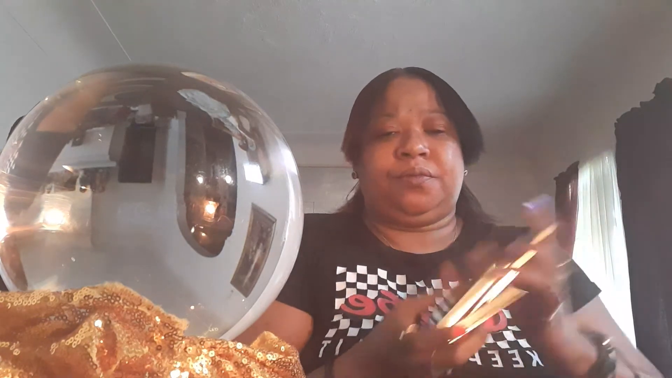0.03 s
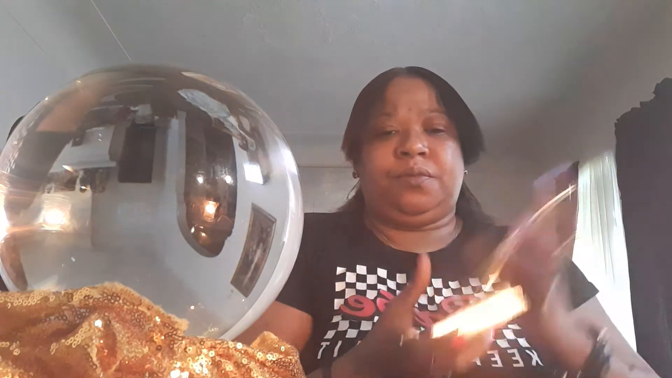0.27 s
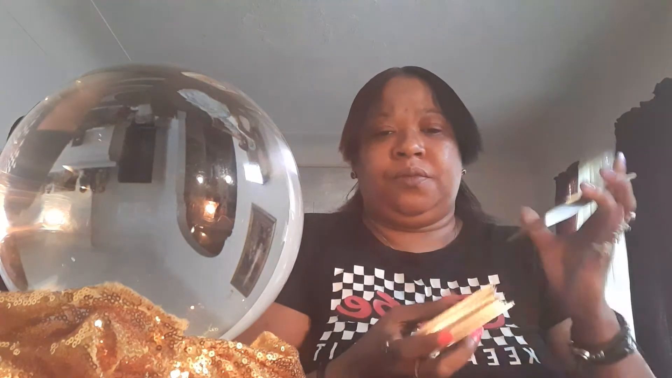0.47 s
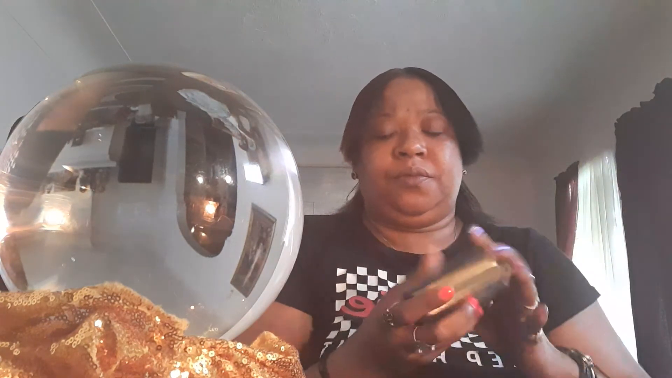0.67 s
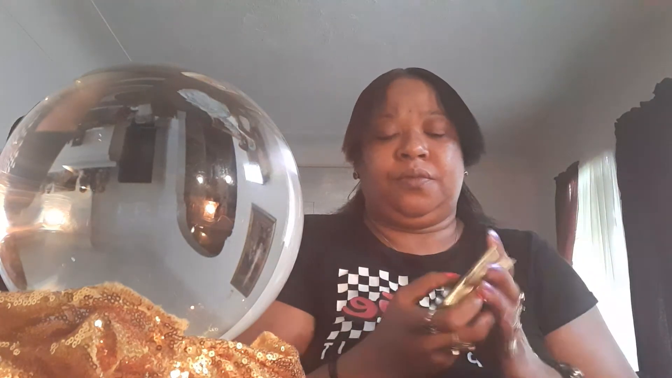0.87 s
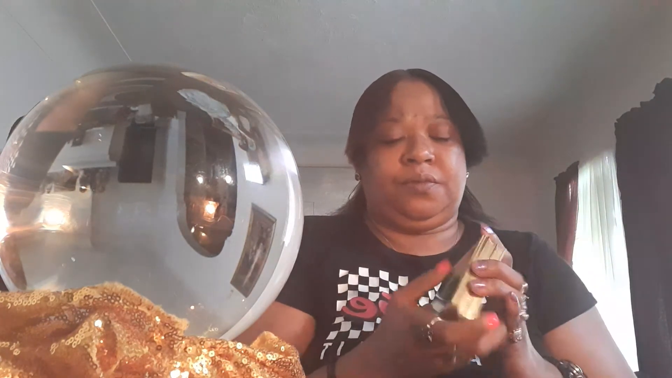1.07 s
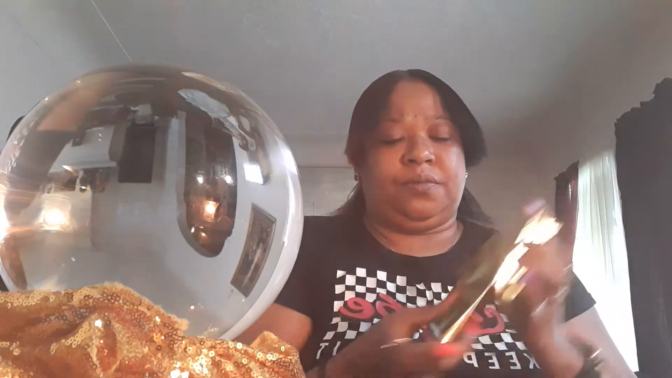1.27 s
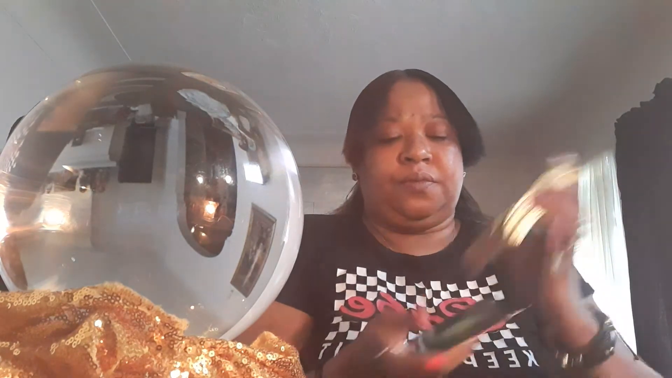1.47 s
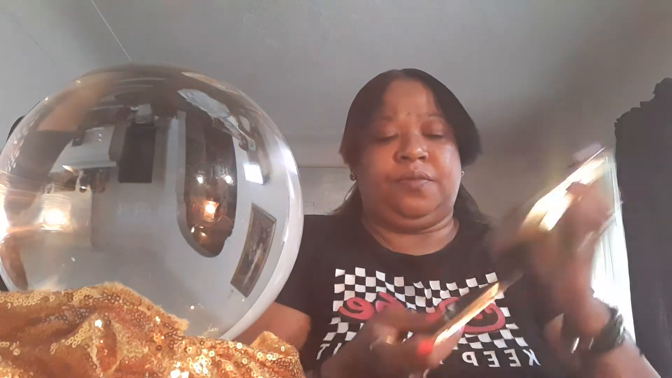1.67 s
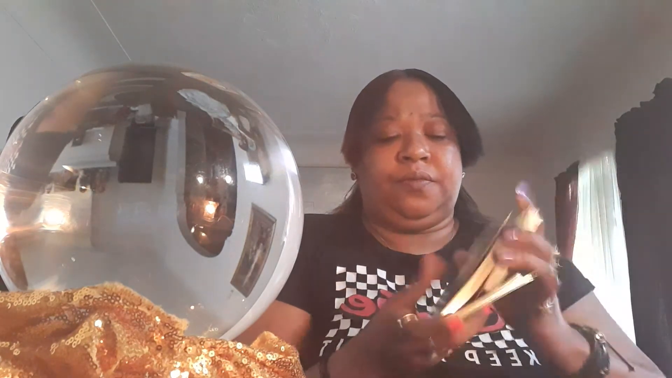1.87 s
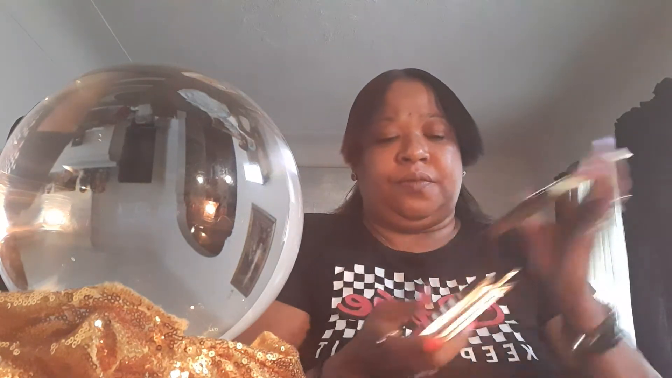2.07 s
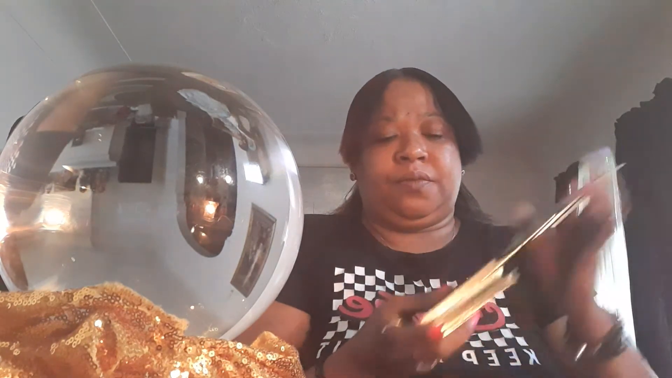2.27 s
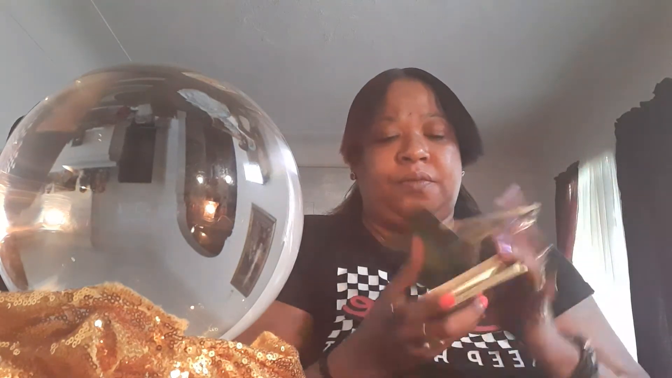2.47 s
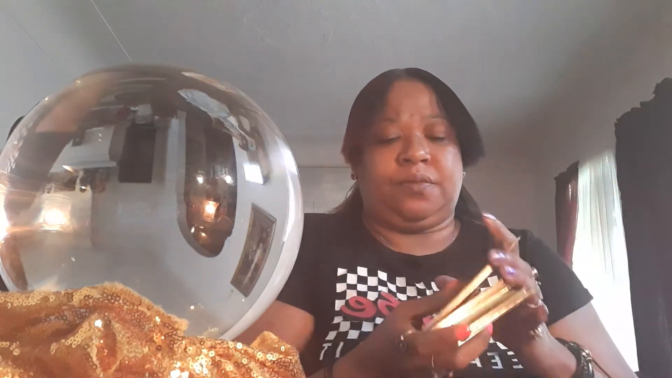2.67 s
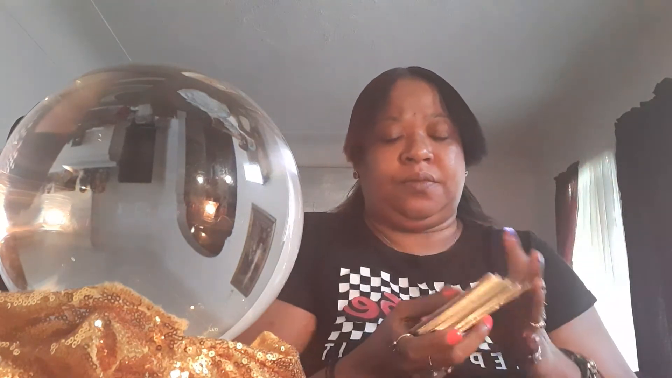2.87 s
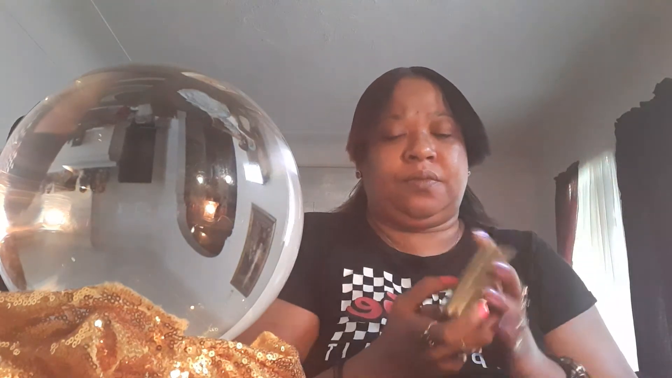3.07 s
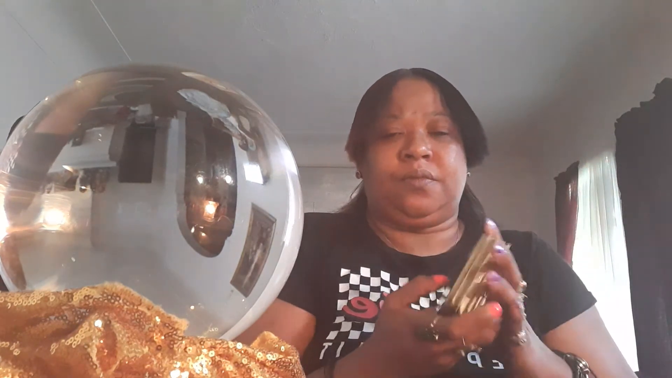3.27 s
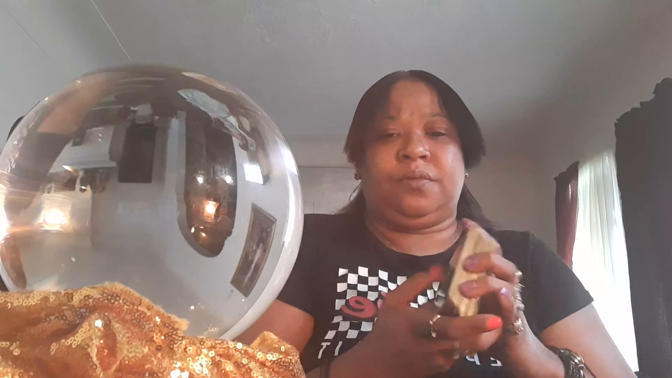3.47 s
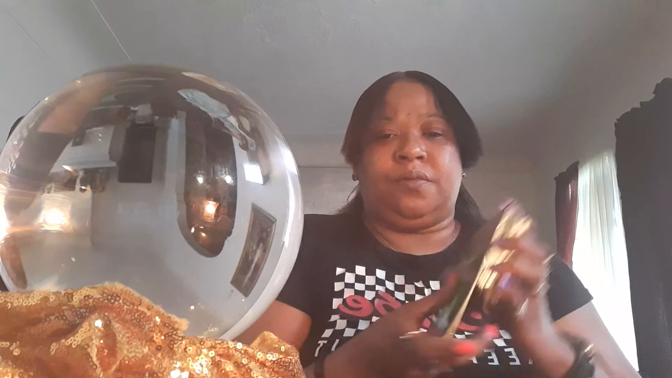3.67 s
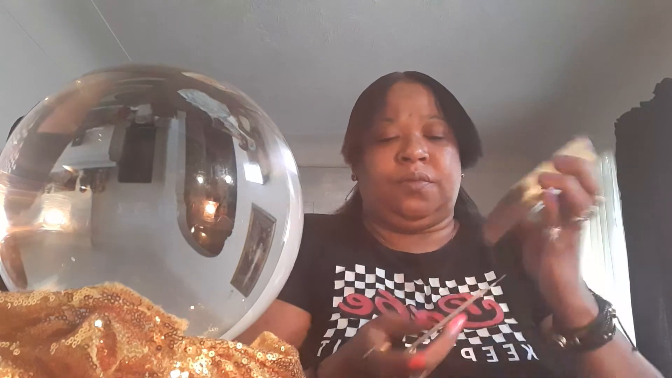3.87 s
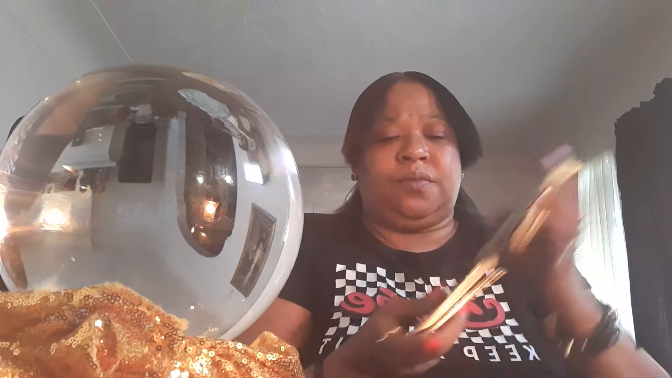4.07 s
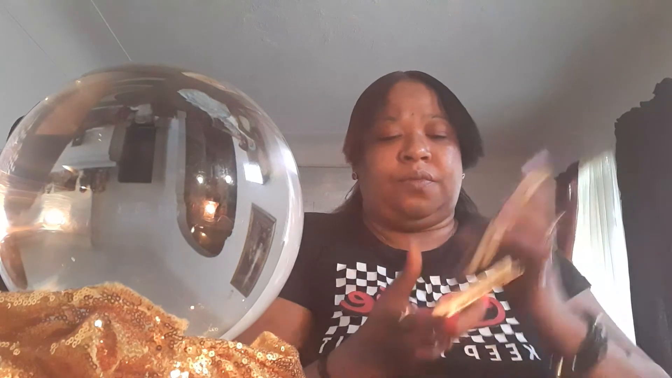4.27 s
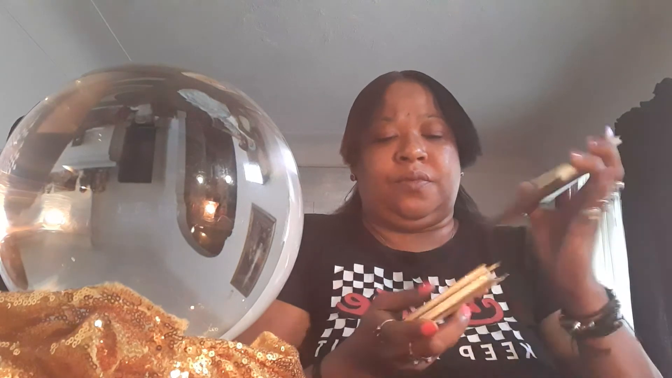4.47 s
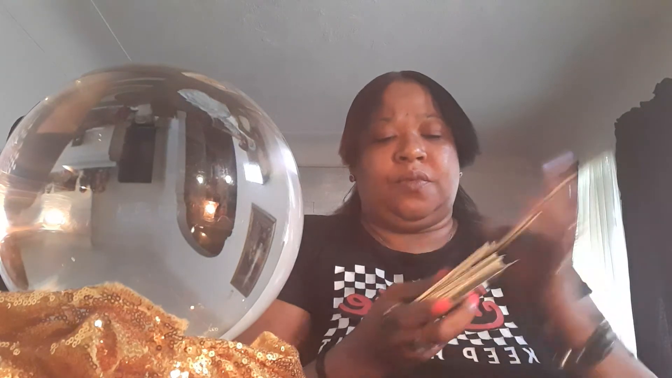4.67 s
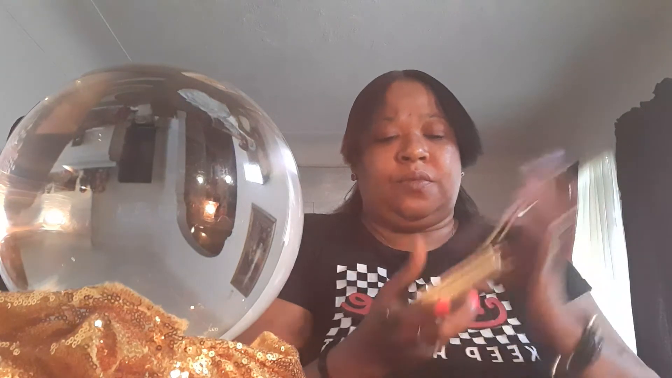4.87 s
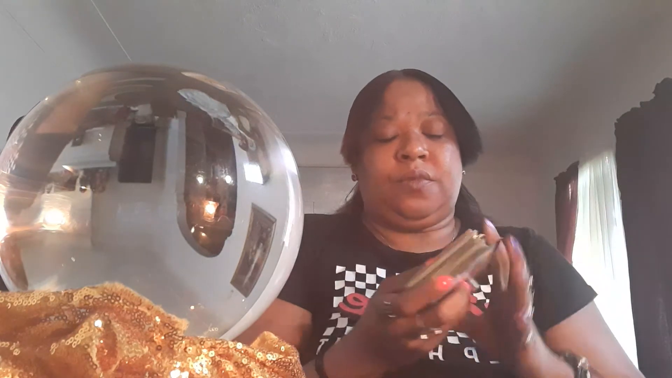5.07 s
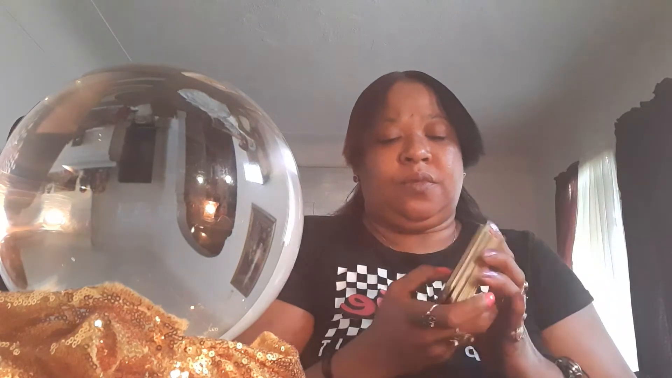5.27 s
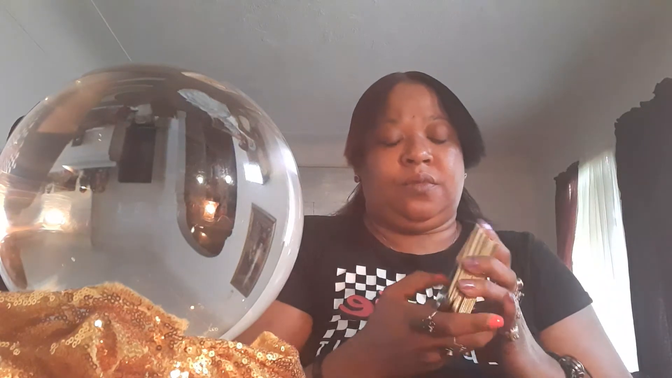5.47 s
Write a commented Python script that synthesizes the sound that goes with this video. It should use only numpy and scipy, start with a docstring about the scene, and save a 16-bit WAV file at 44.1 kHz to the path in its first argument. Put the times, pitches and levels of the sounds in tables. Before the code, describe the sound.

Large stiff cards are shuffled overhand in a small room, with papery slides, sharp slaps and one much harder double smack midway.

```python
"""A deck of large cards is shuffled overhand in a small, bare room, about a metre from a stereo phone.
From the start, over a soft rumble and a little hiss, packets slide by friction noise and slap down with a pop of
trapped air, a crack of edges and, at times, a dull damped tone; the room rings after each.
A faint hum of two low tones comes and goes from 0.75 to 2.4 s, and single edges tick now and then.
The hardest slaps come near 2.43 s; a thin scrape follows near 3.9 s, then more strokes to the end."""
import sys
import numpy as np
from scipy import signal
from scipy.fft import rfft, irfft, next_fast_len
from scipy.io import wavfile
from scipy.ndimage import uniform_filter1d

SR = 44100
rng = np.random.default_rng(int(sys.argv[2]) if len(sys.argv) > 2 else 0)


def bounce(signal):
    """Save signal as a 16-bit WAV file at the path given by the first command-line argument."""
    frames = np.transpose(np.atleast_2d(signal))
    limited = np.clip(frames, -1, 1)
    pcm = np.round(limited * 32767).astype(np.int16)
    wavfile.write(sys.argv[1], SR, pcm)


N = 243516
TIME = np.arange(N) / SR  # seconds

# Colour of rubbed card. Each row: frequency in Hz, relative level in dB.
PAPER_COLOUR = [(30, -48), (100, -8), (250, -8), (400, -5), (650, 1.5), (1100, -5), (1600, -5), (2500, -2),
                (3300, -5), (4600, -0.5), (6300, -8), (9000, -8), (14000, -8.5), (16000, -20)]
SETTLE_S = .003  # how quickly card edges stop pattering after a landing


def undb(db):
    """Decibels to gain."""
    return 10 ** (np.asarray(db) / 20)


def unit(x):
    """Scale to an rms (average strength) of one."""
    return x / np.sqrt(np.mean(x ** 2))


def lookup(points, hz):
    """Read (Hz, value) points on a log-frequency axis."""
    f, value = np.transpose(points)
    return np.interp(np.log(hz + 1), np.log(f), value)


def colour(x, points, tilt_db=0):
    """Causal filter through (Hz, dB) points, tilted per octave; white noise keeps its power."""
    size = 2 * next_fast_len(x.shape[-1])
    hz = np.arange(size // 2 + 1) * SR / size
    gain = unit(undb(lookup(points, hz) + tilt_db * np.log2(1 + hz / 500)))
    # folding the cepstrum onto positive times makes the filter act without any pre-echo
    cepstrum = irfft(np.log(gain))
    cepstrum[1:size // 2] *= 2
    cepstrum[size // 2 + 1:] = 0
    response = np.exp(rfft(cepstrum))
    return irfft(rfft(x, size) * response)[..., :x.shape[-1]]


def high_pass(x, hz, order=4):
    """Steep high-pass."""
    return signal.sosfilt(signal.butter(order, hz, "high", fs=SR, output="sos"), x)


def add(track, start, sound):
    """Mix a sound into a track at a time in seconds."""
    i = max(int(start * SR), 0)
    track[..., i:i + sound.shape[-1]] += sound[..., :N - i]


def walk(rate):
    """Slow chance: random levels, one every 1 / rate seconds, joined by slopes and scaled to an rms of one."""
    k = int(SR / rate)
    steps = np.repeat(rng.standard_normal(N // k + 1), k)
    return unit(uniform_filter1d(steps, k)[:N])


def swell(middle, width):
    """A smooth rise and fall with a peak of one."""
    return np.exp(-.5 * ((TIME - middle) / width) ** 2)


def two_ports(count, alike_hz, most=0.87):
    """Diffuse noise at two close microphone ports: alike in the bass, unrelated above."""
    hz = np.arange(count // 2 + 1) * SR / count
    likeness = most / (1 + (hz / alike_hz) ** 4)
    spectra = rfft(rng.standard_normal((2, count))) * np.sqrt([1 + likeness, 1 - likeness])
    mid, side = irfft(spectra, count)
    return np.array([mid + side, mid - side]) / np.sqrt(2)


def at_ports(x):
    """The hands are to the right, so the left port hears them a moment later."""
    right_lead_s = .00004
    return np.array([np.interp(TIME - right_lead_s, TIME, x), x])


def ring(hz, t60, rise, glide=0):
    """A damped tone with a soft start and about unit peak; its pitch climbs by the share glide as it dies."""
    t = TIME[:SR // 3]
    # t60 is the time in seconds to fall by 60 dB
    envelope = (1 - np.exp(-t / rise)) ** 2 * np.exp(-np.log(1000) * t / t60)
    pitch = hz * (1 + glide * (np.minimum(2 * t / t60, 1) - .5))
    return envelope / envelope.max() * np.sin(2 * np.pi * np.cumsum(pitch) / SR)


def thud(hz, t60, glide=0, rise_cycles=0.37):
    """A dull damped tone; the lower it is, the softer its start."""
    return high_pass(ring(hz, t60, rise_cycles / hz, glide), hz * 2 / 3)


def patter(settle, alike_hz=2000):
    """Card edges meeting within a few milliseconds: a short burst with an even spectrum."""
    t = TIME[:SR // 20]
    fade = np.exp(-t / settle)
    # keep only the noise's phases, so that every frequency is equally strong
    phases = np.angle(rfft(two_ports(len(t), alike_hz) * fade))
    burst = irfft(np.exp(1j * phases), len(t)) * np.sqrt(fade)
    return unit(burst) * np.sqrt(np.mean(fade ** 2))


def friction(grain_hz=1600, catch_hz=200, alike_hz=900):
    """Paper fibres stick and slip: fast grains and slower catches raise and lower the noise at random."""
    grip = unit(undb(3 * walk(grain_hz) + 2.6 * walk(catch_hz)))
    return grip * two_ports(N, alike_hz)


def background(rumble_db=10):
    """A slowly changing rumble under a nearly steady hiss, both made of coloured noise."""
    # Level of the rumble. Each row: time in seconds, level in dB before rumble_db is added.
    rumble_level = [(0.0, -60.5), (1.55, -59.5), (1.78, -60), (3.74, -69), (4.0, -61.5), (5.5, -61)]
    # Colour of the rumble. Each row: frequency in Hz, relative level in dB.
    rumble_colour = [(25, -36), (45, -13), (65, -0.5), (95, 7.5), (150, -1), (200, 4.5), (250, -5.5),
                     (310, 0.5), (420, -10), (700, -13), (1000, -8.5), (1500, -33), (4000, -43.5)]
    # Colour of microphone hiss and faint handling noise. Each row: frequency in Hz, relative level in dB.
    hiss_colour = [(100, -16), (650, 4), (1000, -14), (1500, -9), (2600, -10), (3500, -18.5), (4500, -9),
                   (5600, -18.5), (9000, -27.5), (13000, -17), (16000, -19)]
    hiss_db = -61.5
    level_db = np.interp(TIME, *np.transpose(rumble_level)) + rumble_db
    rumble = unit(colour(two_ports(N, 350), rumble_colour)) * undb(level_db)
    hiss = unit(colour(two_ports(N, 820), hiss_colour)) * undb(hiss_db + .5 * walk(18.0))
    return rumble + hiss


def slides():
    """Each stroke bites, eases and lets go, then swishes as the packet lifts; soft rubs even up the deck."""
    # Overhand strokes, one packet dragged across the other. Each row: contact in seconds, relative level in dB,
    # attack in seconds, length in seconds, brightness in dB per octave, lift-off delay in seconds,
    # lift-off level in dB against the stroke.
    strokes = [(0.023, -32.5, 0.0084, 0.041, -2, 0.11, -6.5), (0.323, -34.5, 0.0078, 0.058, 0, 0.045, -24),
               (0.617, -38, 0.0053, 0.073, -2, 0.078, -62), (1.356, -32, 0.012, .018, -3.5, 0.072, -36),
               (1.567, -32, 0.015, 0.062, -2.5, 0.081, -0.5), (1.895, -34.5, 0.023, 0.046, -2, 0.069, -9),
               (2.178, -32.5, 0.015, 0.049, 0, 0.16, -9), (2.428, -18.5, 0.00075, .086, -3.5, 0.12, -15.5),
               (3.773, -34.5, 0.021, 0.018, -2, 0.13, -21), (4.016, -28.5, 0.024, 0.029, -2, 0.072, -7),
               (4.3, -28.5, 0.0018, 0.056, 0, 0.12, -11), (4.595, -24, 0.0014, .026, -1, 0.075, -11.5),
               (4.894, -27.5, 0.0017, 0.04, -2.5, 0.063, -13.5)]
    # Rubs as cards shift in the hand and the deck is evened up.
    # Each row: middle in seconds, width (standard deviation) in seconds, relative level in dB.
    rubs = [(0.358, 0.0042, -37), (.88, 0.059, -55), (1.01, .012, -50), (1.325, 0.05, -52.5),
            (2.81, 0.044, -51.5), (3.108, 0.035, -54), (3.401, 0.013, -57.5), (4.33, 0.009, -40.5),
            (5.224, 0.037, -48), (5.46, 0.048, -58)]
    # the rub climbs by rise_db per attack time, eases as the packet slows, then lets go
    rise_db, ease_db, release_db_per_s = 14, 2, 1523
    lift_width_s = 0.017
    lift_bright_db, rub_bright_db = -2, -1  # per octave

    grains, out, lifts = friction(), np.zeros((2, N)), np.zeros(N)
    for s, db, attack, length, bright_db, lift_delay, lift_db in strokes:
        start = max(s - 2 * attack, 0)
        rub = grains[:, int(start * SR):][:, :SR // 4]
        t = TIME[:rub.shape[1]] + start - s  # seconds from contact
        shape_db = rise_db * np.minimum(t / attack, 0)
        shape_db = shape_db - ease_db * np.clip(t / length, 0, 1)
        shape_db = shape_db - release_db_per_s * np.maximum(t - length, 0)
        add(out, start, colour(rub * undb(db + shape_db), PAPER_COLOUR, bright_db))
        lifts += undb(db + lift_db) * swell(s + lift_delay, lift_width_s)
    evening = sum(undb(db) * swell(s, width) for s, width, db in rubs)
    swishes = colour(friction() * lifts, PAPER_COLOUR, lift_bright_db)
    return out + swishes + colour(grains * evening, PAPER_COLOUR, rub_bright_db)


def slaps(pop_db=0.0, crack_db=-4.0, snap_hz=6000, low_hz=340):
    """Each landing pops the trapped air, sets the packet ringing briefly, and cracks the card edges together."""
    # Packets landing. Each row: start in seconds, strength in dB, pop pitch in Hz,
    # air cushion in dB (how far the pop is raised over the crack of the edges).
    landings = [(0.0226, -27, 2050, 6), (0.3219, -21, 2080, 2.5), (.416, -20, 850, -1.5),
                (.63, -31, 980, 2.5), (0.6528, -23, 1193, 3), (.667, -27.5, 530, 5),
                (1.354, -27.5, 1590, -6), (1.358, -30.5, 4550, 1), (1.585, -22, 1465, 1.5),
                (1.64, -23, 1497, 2), (1.883, -30.5, 1490, -3), (1.995, -28, 2010, -17),
                (2.1725, -23.5, 554, -5), (2.241, -30.5, 2520, -2.5), (2.4309, -6, 1445, -2),
                (2.4533, -8, 1300, -6), (2.4575, -11, 1220, 5), (2.5011, -16, 1078, 4.5),
                (3.0238, -44, 1920, -1), (3.7704, -25.5, 670, -7.5), (3.9968, -16.5, 1520, -10),
                (4.003, -16.5, 1450, -10.5), (4.0862, -35, 1640, 2.5), (4.3, -21, 2120, -15),
                (4.3195, -17, 3835, -1), (4.332, -26, 3260, 5), (4.41, -26, 886, -1),
                (4.5962, -17.5, 1620, 7), (4.895, -17.5, 2435, -1.5), (4.909, -26, 2530, -28),
                (5.2198, -33.5, 1540, -28)]
    # Ways a packet vibrates as it lands. Each row: multiple of the pop pitch, relative level in dB.
    packet_modes = [(.66, -9), (1, 0), (1.45, -5)]
    # Colour of a cracking edge. Each row: frequency in Hz, relative level in dB.
    crack_colour = [(30, -44.5), (100, -14), (280, -8), (600, 4.5), (1200, 3.5), (2400, 4.5), (4600, 1.5),
                    (6500, -12.5), (16000, -71)]
    pop_t60_s, pop_rise_s = .009, .0011
    # the air pocket shrinks as the packet closes, so the pop rises by this share of its pitch
    pop_glide = .3
    # the treble snap follows the slap's strength, less a share of the air cushion
    snap_db, cushion_share = -10.5, 0.14

    pops, cracks, snaps = np.zeros(N), np.zeros((2, N)), np.zeros((2, N))
    for s, db, hz, cushion_db in landings:
        for ratio, mode_db in packet_modes:
            pop = ring(hz * ratio, pop_t60_s, pop_rise_s, pop_glide)
            add(pops, s, undb(db + cushion_db + pop_db + mode_db) * pop)
        add(cracks, s, undb(db + crack_db) * patter(SETTLE_S))
        add(snaps, s, undb(db + snap_db - cushion_share * cushion_db) * patter(SETTLE_S))
    # a card is too small to radiate bass
    pops = high_pass(pops, low_hz)
    return at_ports(pops) + colour(cracks, crack_colour) + high_pass(snaps, snap_hz)


def dull_tones():
    """Dull, short damped tones under the landings: low pops of packets and knocks of the deck."""
    # Low pops and knocks. Each row: start in seconds, level in dB, pitch in Hz.
    low_tones = [(.0227, -22, 890), (.418, -19.5, 716), (.6525, -16.5, 743), (.656, -21, 383),
                 (1.363, -32.5, 462), (1.56, -27, 565), (2.325, -34, 388), (2.433, -17, 550),
                 (2.454, -9.5, 506), (3.026, -42, 516)]
    tone_cycles = 7.2  # until it has fallen by 60 dB
    out = np.zeros(N)
    for s, db, hz in low_tones:
        add(out, s, undb(db) * thud(hz, tone_cycles / hz))
    return at_ports(out)


def opposed(pair, turn_hz=1300, width_hz=420):
    """In one narrow band the two ports hear the cards in opposite phase."""
    left, right = pair
    band = signal.lfilter(*signal.iirpeak(turn_hz, turn_hz / width_hz, fs=SR), right)
    return np.array([left, right - 2 * band])


def room(x, wet_db=-4.0, modes_db=-57):
    """Close walls answer within milliseconds: a dense tail with a few resonances standing out."""
    # How long the room rings. Each row: frequency in Hz, time to fall by 60 dB in seconds.
    ring_times = [(100, .8), (250, .55), (500, .45), (1500, .44), (5000, .47), (10000, .43), (16000, .39)]
    # Colour of the echo. Each row: frequency in Hz, relative level in dB.
    echo_colour = [(100, -7.5), (190, -12.5), (260, 0), (380, 1.5), (600, -1.5), (1200, -3.2), (2500, -2),
                   (5000, -2), (16000, 1.5)]
    # Strongest resonances. Each row: frequency in Hz, level in dB before modes_db is added.
    resonances = [(369, -4), (494, -3), (576, -2), (648, -2), (678, -5), (760, -6), (836, -4), (890, -4),
                  (1110, -4), (1231, -4), (1395, -2), (1537, -2)]

    t = TIME[:SR * 3 // 4]
    # noise that dies away at its own pace in each frequency band
    hz, when, bands = signal.stft(two_ports(len(t), 700, most=.65), SR, nperseg=256)
    decay = np.exp(-np.log(1000) * when / lookup(ring_times, hz)[:, None])
    tail = signal.istft(bands * decay, SR)[1][:, :len(t)]
    tail = tail * np.clip(t / .006 - .5, 0, 1)  # fades in from 3 to 9 ms
    tail = colour(unit(tail) / np.sqrt(len(t)), echo_colour) * undb(wet_db)
    for f, db in resonances:
        # the shorter the wave, the more its phase differs between the ports
        phase = rng.uniform(0, 2 * np.pi) + rng.standard_normal((2, 1)) * f / 900
        fade = np.exp(-np.log(1000) * t / lookup(ring_times, f))
        tail = tail + undb(modes_db + db) * np.sin(2 * np.pi * f * t + phase) * fade
    return signal.fftconvolve(x, tail, axes=1)[:, :N]


def low_thumps():
    """Two low thumps near 120 Hz, at 0.66 and 2.47 s, sinking in pitch as they fade."""
    # Each row: start in seconds, level in dB.
    thumps = [(.662, -27.5), (2.465, -33.5)]
    thump_hz, thump_t60_s = 119, 0.22
    thump_sag = .16  # share of its pitch by which the thump sinks
    out = np.zeros(N)
    for s, db in thumps:
        add(out, s, undb(db) * thud(thump_hz, thump_t60_s, -thump_sag))
    return at_ports(out)


def hum(hum_db=-2.0, waver_db=4.0, wander_hz=3.5, port_phase=0.38):
    """Two low sine tones swell, waver in level and wander in pitch, then die away."""
    # Level of the hum. Each row: time in seconds, lower tone in dB, upper tone in dB, before hum_db is added.
    hum_levels = [(0.8, -70, -50.5), (0.938, -74, -56), (1.04, -50, -47.5), (1.664, -46, -54.5),
                  (1.726, -46, -60), (1.966, -67, -54), (2.328, -53, -61), (2.4, -67, -67)]
    # Middle pitch in Hz of the lower tone, then of the upper tone.
    tone_hz = (122, 213.5)
    start_s, fade_s = 0.75, 0.083

    s, *levels = np.transpose(hum_levels)
    fade = np.clip(np.minimum(TIME - start_s, s[-1] - TIME) / fade_s, 0, 1)
    port_phases = np.array([[-port_phase], [port_phase]])  # radians, left and right
    out = 0
    for hz, db in zip(tone_hz, levels):
        pitch = hz + wander_hz * walk(14.35)
        phase = 2 * np.pi * np.cumsum(pitch) / SR + port_phases
        level_db = np.interp(TIME, s, db) + hum_db + waver_db * walk(12.96)
        out = out + np.sqrt(2) * np.sin(phase) * undb(level_db)
    return out * fade


def flicks(flick_db=1, tilt_db=3):
    """One stiff edge snaps free past a nail: a thin, bright tick of noise."""
    # Single card edges. Each row: start in seconds, level in dB before flick_db is added.
    ticks = [(0.834, -48), (1.005, -56), (1.1978, -46.5), (2.344, -50.5), (3.592, -48.5), (4.4728, -36)]
    out = np.zeros((2, N))
    for s, db in ticks:
        add(out, s, undb(db + flick_db) * patter(SETTLE_S / 2))
    return colour(out, PAPER_COLOUR, tilt_db)


def scrape(sharpness=14):
    """Friction on a card's edge rings one narrow, high resonance."""
    middle_s, width_s, pitch_hz, level_db = 3.92, .05, 4350, -55
    thin = signal.lfilter(*signal.iirpeak(pitch_hz, sharpness, fs=SR), friction())
    return unit(thin) * undb(level_db) * swell(middle_s, width_s)


def scene(slide_db=-2):
    """The cards, the low thumps, their echo and the room's own sound."""
    cards = undb(slide_db) * slides() + slaps() + dull_tones() + low_thumps() + flicks() + scrape()
    cards = opposed(cards)
    return background() + cards + room(cards) + hum()


def record(dry):
    """Limits the loudest peaks and removes everything above 16 kHz."""
    top_hz = 16000
    low_pass = signal.ellip(8, .2, 70, top_hz, fs=SR, output="sos")
    return signal.sosfilt(low_pass, np.clip(dry, -.9, .9))


dry = scene()
out = record(dry)
bounce(out)
```